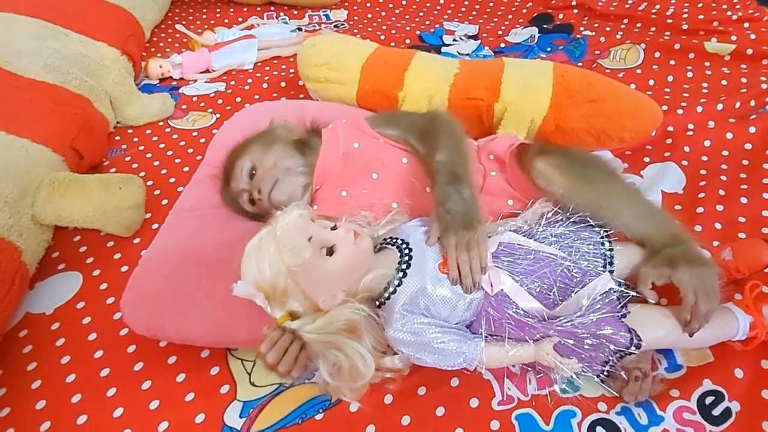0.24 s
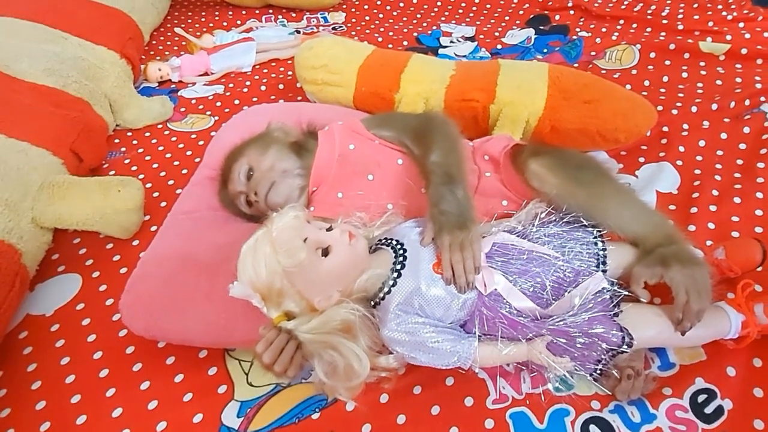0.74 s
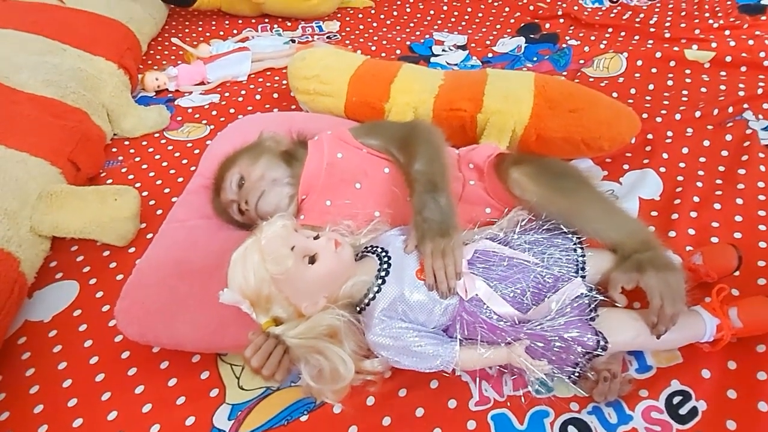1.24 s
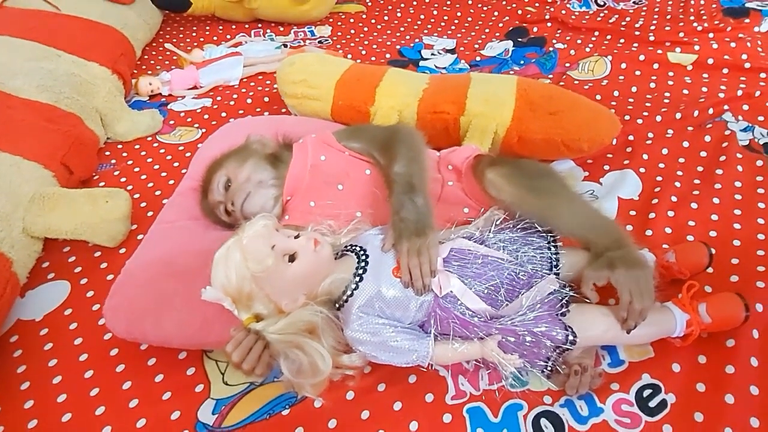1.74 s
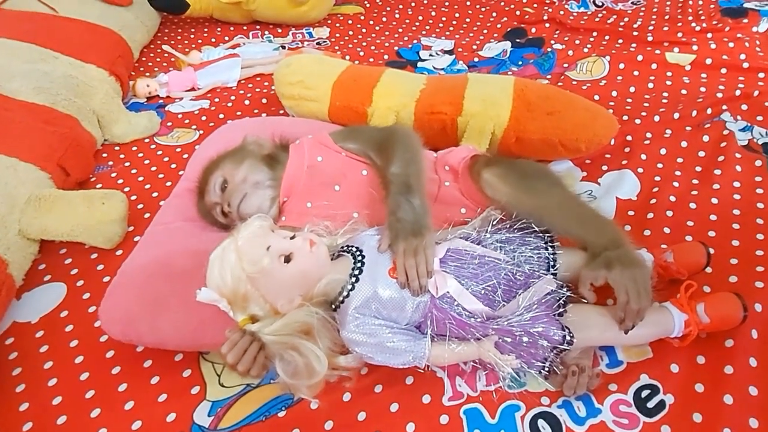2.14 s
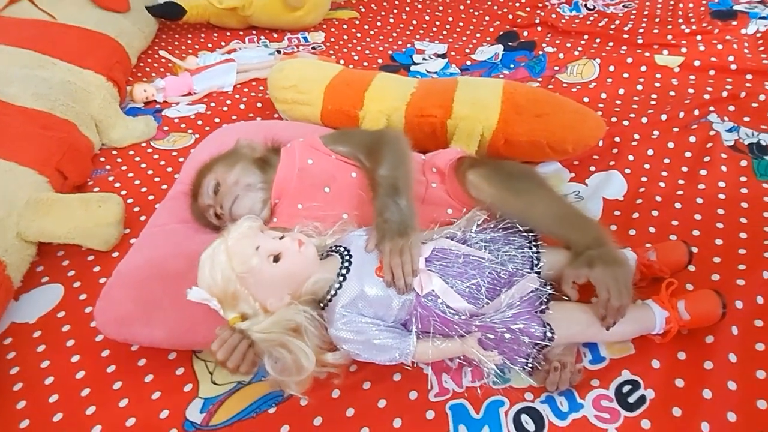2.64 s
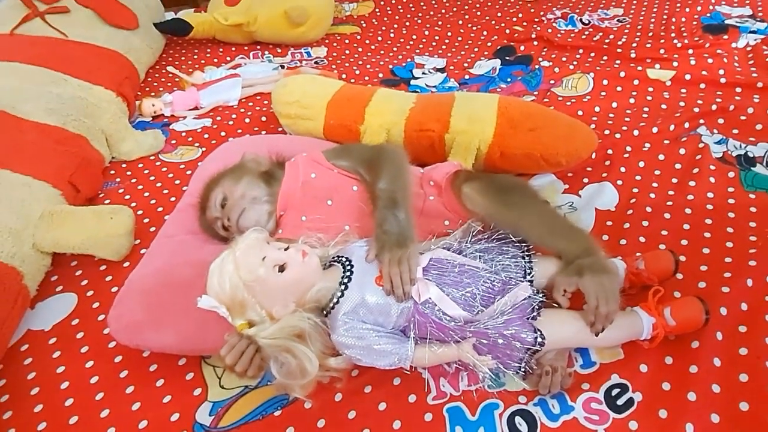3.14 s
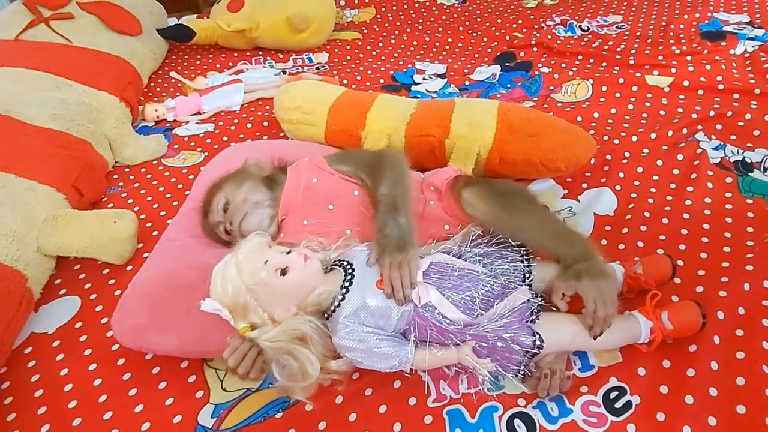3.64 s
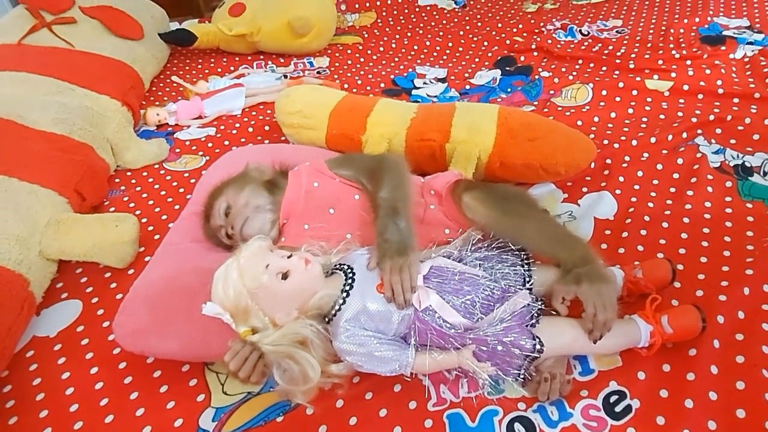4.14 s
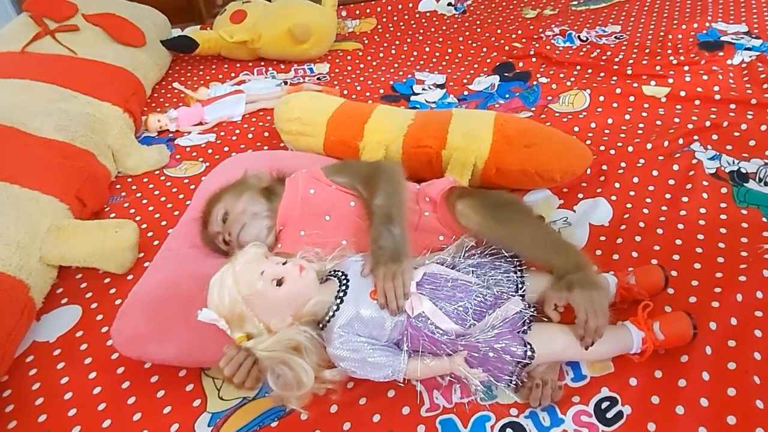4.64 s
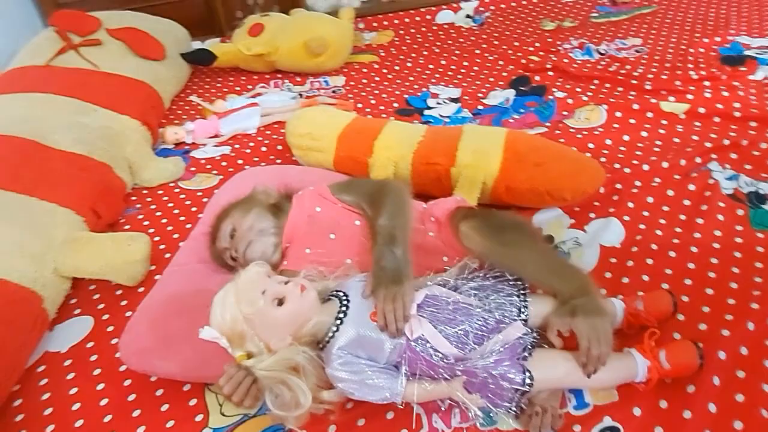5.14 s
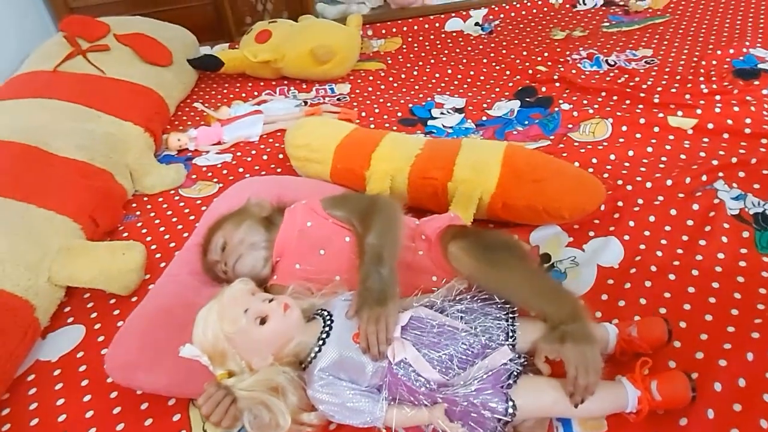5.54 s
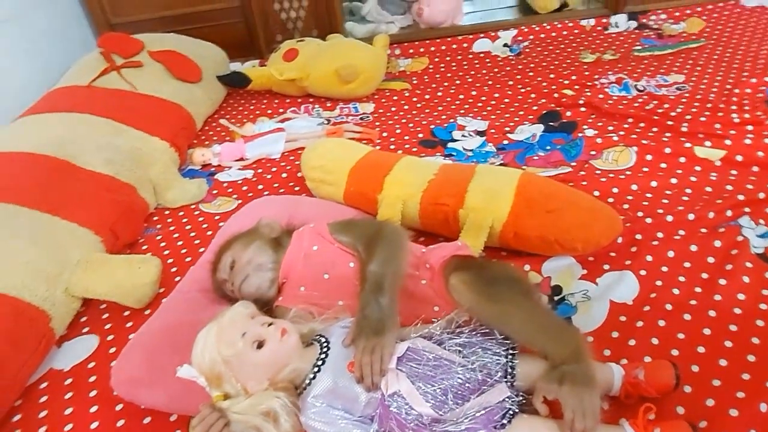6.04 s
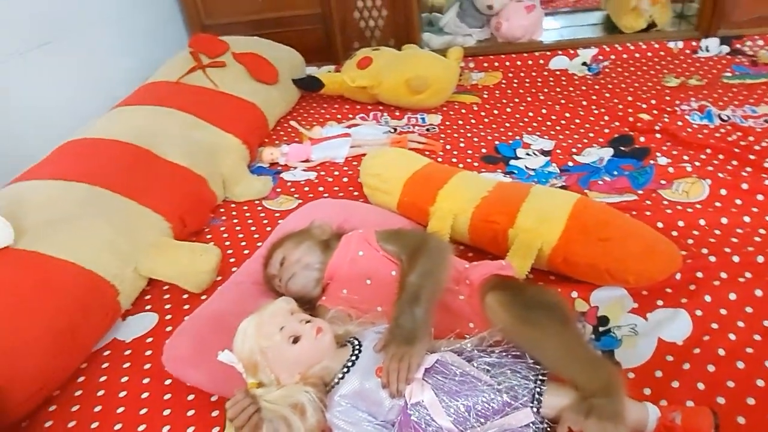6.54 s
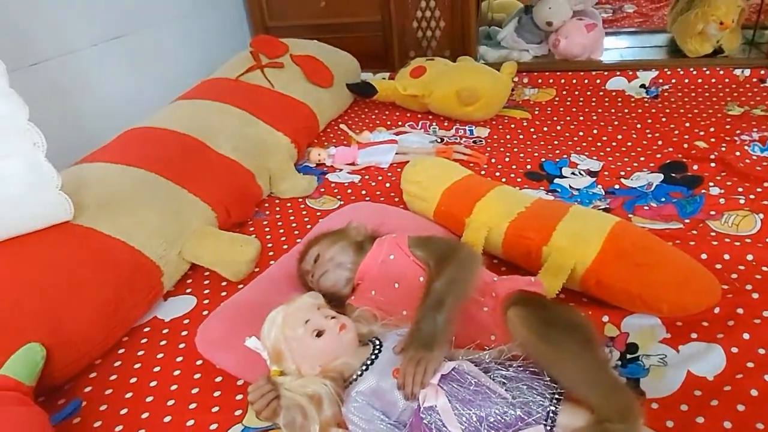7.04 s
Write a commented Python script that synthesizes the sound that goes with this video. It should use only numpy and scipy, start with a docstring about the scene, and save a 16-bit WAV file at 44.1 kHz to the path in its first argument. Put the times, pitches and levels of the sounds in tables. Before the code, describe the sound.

In a quiet bedroom, fingers shift on a hand-held camera right beside the microphone. A brief low creak comes first, then irregular clicks and small hollow taps mixed with scratchy rubbing, mostly on the left. The handling gets busier past the middle, with one sharp scraping click and another a second later. Bedding rustles faintly, more on the right, over a low room rumble and hiss.

```python
"""A quiet bedroom, where a small animal lies on bedding, heard through a hand-held camera.
Fingers tap, creak and slide on the casing beside the left microphone port; the taps make it ring near
330 Hz. The right port hears a little of the taps. Cloth rustles softly, more on the right.
Both ports share a low room rumble, and each has its own hiss."""
import sys
import numpy as np
from scipy import signal
from scipy.fft import rfft, irfft, next_fast_len
from scipy.io import wavfile
from scipy.ndimage import uniform_filter1d, map_coordinates

SR = 44100
rng = np.random.default_rng(int(sys.argv[2]) if len(sys.argv) > 2 else 0)


def generate_wav(sig):
    """Save sig (samples, or channels by samples) to the path in sys.argv[1] as 16-bit PCM at SR."""
    pcm = np.round(np.clip(np.atleast_2d(sig).T, -1, 1) * 32767).astype(np.int16)
    wavfile.write(sys.argv[1], SR, pcm)


N = 321048

# Tone colours of skin on the casing, bright grit and even higher fizz: f/Hz, level/dB
GRIT_COLOUR = [(2500, -4.5), (4000, -1), (5800, 1), (7000, -8), (8600, -19.5)]
FIZZ_COLOUR = [(7000, -15.5), (9500, 1.5), (12500, 5.5), (14500, -14.5), (16000, -13)]


def amp(db):
    return 10 ** (np.asarray(db) / 20)


def unit_rms(x):
    return x / np.sqrt(np.mean(x ** 2) + 1e-20)


def curves(rows):
    """Join timed points with straight lines: one curve for each column after the time."""
    times, *columns = np.transpose(rows)
    return [np.interp(np.arange(N) / SR, times, column) for column in columns]


def swells(rows):
    """Each row rises 30 dB, holds and fades; the rows add up to one gain curve per level column."""
    full_at, rise, hold, fall, *levels_db = np.transpose(rows)
    t = np.arange(0, N + 32, 32)[:, None] / SR
    before, after = (full_at - t) / rise, (t - full_at - hold) / fall
    shape = amp(-30 * np.maximum(0, np.maximum(before, after)))
    return [np.interp(np.arange(N) / SR, t[:, 0], shape @ amp(db)) for db in levels_db]


def wobble(rate):
    """A smooth curve through `rate` random points a second."""
    return map_coordinates(rng.standard_normal(int(N * rate / SR) + 4), [np.arange(N) * rate / SR])


def filtered(x, response):
    """Scale and delay each frequency in x as response(hz) says."""
    size = next_fast_len(N + SR // 2)
    return irfft(rfft(x, size) * response(np.fft.rfftfreq(size, 1 / SR)), size)[..., :N]


def resonances(hz, notes):
    """How strongly, and how late, a body that rings at these notes answers each frequency."""
    return sum((-1) ** k * amp(db) * 1j * hz * width / (centre ** 2 - hz ** 2 + 1j * hz * width)
               for k, (centre, width, db) in enumerate(notes))


def noise(colour, grain_db=0, rate=300, patchy_db=0):
    """Coloured noise of rms 1; grain makes its level jump, patches make parts of its range come and go."""
    freqs, db = np.transpose(colour)
    grainy = rng.standard_normal(N) * amp(grain_db * wobble(rate))
    spectra = signal.stft(grainy, nperseg=512)[2]
    patches = uniform_filter1d(rng.standard_normal(spectra.shape), size=7, axis=0)
    patches = unit_rms(uniform_filter1d(patches, size=12, axis=1))
    patchy = signal.istft(spectra * amp(patchy_db * patches), nperseg=512)[1][:N]
    tint = lambda hz: amp(np.interp(np.log(hz + 1), np.log(freqs), db, -120, -120))
    return unit_rms(filtered(patchy, tint))


def rumble_and_hiss():
    """The room's rumble is mostly alike at both ports; each port has its own hiss."""
    # How the rumble drifts: t/s, level/dB
    rumble_levels = [(0.0, -64), (.3, -63), (0.5, -57.5), (.8, -64.5), (1.65, -71), (1.92, -66),
                     (2.6, -68.5), (3.08, -70), (4.3, -69), (4.62, -63.5), (5.3, -68.5), (6.0, -69.5),
                     (6.7, -67.5), (7.28, -63)]
    # Tone colours: f/Hz, level/dB
    rumble_colour = [(30, -38.5), (42, -2.5), (52, 7), (100, -3), (160, -6), (300, -21.5), (600, -30),
                     (1200, -70.5)]
    hiss_colour = [(200, 7), (600, -7.5), (2000, -13.5), (3300, -18), (6000, -15.5), (8000, -16.5),
                   (12500, -8.5), (14200, -12.5), (15000, -36.5)]
    shared = noise(rumble_colour, grain_db=3.5, rate=23)
    rumble = np.array([gain * shared + .5 * noise(rumble_colour) for gain in (2.44, 1.43)])
    hiss = np.array([noise(hiss_colour, patchy_db=1.5), noise(hiss_colour, patchy_db=2.5)])
    return amp(curves(rumble_levels)[0]) * rumble + amp([[-74], [-76]]) * hiss


def cloth_rustle():
    """Cloth moves in soft patches; only the nearer, right port gets its swish and the casing's murmur."""
    # Cloth movements: full at/s, rise/s, hold/s, fall/s, cloth/dB, swish/dB, casing/dB
    movements = [(.15, 0.96, 0.24, .3, -78, -70.5, -78), (.45, 0.077, 0.03, .15, -79, -76, -44.5),
                 (.86, 0.031, .03, .12, -95, -91, -49.5), (1.215, 0.046, 0.021, .1, -79, -67, -65),
                 (1.46, 0.22, 0.019, .25, -78, -70, -61.5), (1.75, 0.037, 0.034, .1, -76, -73, -66),
                 (1.95, 0.056, 0.013, .15, -80, -69, -74), (4.45, .04, 0.033, .06, -63.5, -69, -75),
                 (4.57, 0.034, .03, .06, -73, -79, -62), (4.69, 0.061, 0.075, .08, -60, -62, -49.5),
                 (5.0, 0.17, 0.034, .2, -87.5, -74.5, -62), (5.5, 0.25, .3, .2, -83.5, -72.5, -82.5),
                 (5.76, 0.55, 0.082, .15, -70.5, -90, -100.5), (6.1, 0.39, 0.29, .1, -64.5, -74.5, -73),
                 (7.13, 0.17, 0.041, .2, -96, -96.5, -65.5)]
    # Faint swish beneath the movements: t/s, level/dB
    faint_swish = [(0, -73.5), (1.5, -78.5), (2.4, -77.5), (3.5, -111), (4.4, -90), (5.3, -76),
                   (7.28, -89.5)]
    # Tone colours: f/Hz, level/dB
    cloth_colour = [(500, -6), (1000, -5), (1700, 4.5), (2700, -8), (3500, -20), (5000, -39)]
    swish_colour = [(2800, -15), (4500, -4), (6000, -1), (8500, -2), (12000, -4.5), (14300, -8),
                    (15500, -27.5)]
    casing_colour = [(60, -37.5), (130, 13), (300, -13.5), (500, -8.5), (1000, -25), (2000, -48.5)]
    cloth_gain, swish_gain, casing_gain = swells(movements)
    cloth_gain *= amp(1.5 * wobble(25))
    left, right = (cloth_gain * noise(cloth_colour, grain_db=2.5, rate=200, patchy_db=1.6)
                   for port in range(2))
    swish_gain += amp(curves(faint_swish)[0])
    swish_gain *= amp(.8 * wobble(15))
    swish = swish_gain * noise(swish_colour, grain_db=1.5, rate=400, patchy_db=1.4)
    murmur = casing_gain * noise(casing_colour, grain_db=3.5, rate=150)
    return np.array([amp(-0.5) * left, right + swish + murmur])


def finger_taps():
    """Each tap is a short click with a gritty snap, then the casing's ring and a low thump."""
    # Taps: t/s, click/dB, click f/Hz, ring/dB, thump/dB, grit/dB, fizz/dB, extra drop on the right/dB
    taps = [(0.234, -48.5, 1100, -62, -55, -40, -59, 14), (0.255, -53, 783, -47, -46, -66, -66, 30),
            (0.84, -62, 730, -59, -47.5, -80, -71, -3), (1.203, -24, 1090, -37, -41, -34, -39, 18),
            (1.239, -40.5, 1330, -50, -58, -42, -66, 8), (1.329, -54, 826, -55, -47, -53, -70, 17),
            (1.381, -51, 740, -45.5, -48, -72, -68, 27), (1.406, -60, 766, -42, -45, -74, -62, 24),
            (1.439, -43, 750, -47, -53, -49.5, -65, 8), (1.474, -56, 795, -54, -71, -68, -71, 16),
            (1.562, -44, 760, -42, -46.5, -66, -62, 24), (1.733, -35.5, 1106, -47, -42, -62, -63, 19),
            (1.738, -30.5, 760, -30, -35, -39, -37, 24), (1.755, -58, 760, -35, -39.5, -65, -60, 28),
            (1.774, -37, 668, -30.5, -35.5, -47, -64, 31), (1.829, -45.5, 663, -33.5, -37.5, -52, -48, 38),
            (1.93, -37.5, 755, -34, -37, -45.5, -40.5, 21), (1.948, -48, 686, -41, -37, -63, -62, 16),
            (1.966, -53, 800, -42, -57, -65, -55, 26), (2.247, -20.5, 635, -33, -31, -15, -31.5, 39),
            (2.414, -33.5, 824, -44.5, -45, -36.5, -54, 34), (2.608, -33, 1120, -48.5, -42, -56, -71, 34),
            (2.764, -35, 1090, -44.5, -35.5, -48, -68, 43), (3.182, -48, 1270, -63, -59, -66, -55, 26),
            (3.575, -33.5, 1510, -50, -58, -43, -65, 29), (3.595, -31.5, 960, -47, -37.5, -49, -65, 38),
            (3.806, -45, 1560, -70, -39.5, -67, -58, 36), (3.846, -19.5, 1620, -53, -45, -21, -41.5, 33),
            (3.894, -37, 910, -53, -34, -53, -60, 34), (3.939, -17, 1410, -40.5, -37, -20, -42, 51),
            (4.027, -44, 1040, -40, -36, -66, -72, 32), (4.078, -48, 1070, -54, -56, -70, -66, 24),
            (4.159, -52, 1130, -60, -60, -50, -64, 25), (4.287, -42.5, 1290, -48, -55, -42, -62, 23),
            (4.41, -42, 2300, -31, -34, -24, -37.5, 21), (4.446, -20.5, 845, -29, -26.5, -36, -42, 33),
            (4.531, -52, 805, -44, -52, -65, -70, 30), (4.557, -25, 1010, -35.5, -32.5, -37.5, -61, 20),
            (4.596, -25, 1140, -39, -43, -32, -34, 17), (4.68, -26, 730, -38.5, -42, -40.5, -36.5, 7),
            (4.704, -41, 950, -56, -37, -39, -50, 17), (4.72, -34.5, 990, -33.5, -48, -41, -38, 6),
            (4.803, -22.5, 1400, -33, -31.5, -22, -15, 37), (4.867, -37.5, 1250, -39, -38.5, -36, -55, 22),
            (4.926, -35, 820, -22.5, -29.5, -35, -45, 43), (5.04, -27.5, 1930, -43, -44, -43, -52.5, 46),
            (5.064, -13, 1000, -44, -58, -13.5, -17.5, 53), (5.068, -11, 1280, -40, -45.5, -28, -24, 56),
            (5.231, -45, 1010, -40, -39.5, -43.5, -57, 38), (5.84, -63.5, 1400, -77, -80, -77, -73, -3),
            (6.301, -24, 1203, -35.5, -54, -39.5, -51.5, 40.5),
            (6.3025, -10.5, 1256, -16.5, -23, -19.5, -26.5, 45),
            (6.358, -37.5, 1650, -54.5, -67, -69, -66.5, 22),
            (6.793, -55.5, 803, -48, -48.5, -66, -68, 31.5), (6.929, -52.5, 705, -38, -41, -63, -69.5, 28),
            (7.007, -53.5, 680, -38, -38.5, -70.5, -53.5, 27)]
    out, t = np.zeros((2, N + SR)), np.arange(SR // 10) / SR
    grit, fizz = (np.pad([noise(colour), noise(colour)], [(0, 0), (0, SR)])
                  for colour in (GRIT_COLOUR, FIZZ_COLOUR))
    fade = lambda rise, fall: amp(-60 * t / fall) * (1 - np.exp(-(t / rise) ** 2))  # both in seconds
    wave = lambda hz: np.sin(2 * np.pi * hz * t)
    for start, click_db, click_hz, ring_db, thump_db, grit_db, fizz_db, drop_db in taps:
        tune = 1 + .04 * rng.standard_normal(3)
        span = slice(round(start * SR), round(start * SR) + len(t))
        bite = 0.8 * amp(0.45 * (click_db + 12))  # harder taps have a stronger overtone
        tones = wave(click_hz) + bite * wave(2.2 * click_hz) + .5 * wave(0.63 * click_hz)
        click = 3.0 * amp(click_db) * fade(0.00028, 3.1 / click_hz) * tones
        ring = -2.6 * amp(ring_db) * fade(0.0013, 0.031) * np.sin(2 * np.pi * 335 * tune[0] * (t - .0009))
        thump = 3.56 * amp(thump_db) * fade(0.002, 0.026) * (wave(100 * tune[1]) + 0.77 * wave(190 * tune[2]))
        snap = 0.41 * fade(0.00029, 0.0093) * (amp(grit_db) * grit[:, span] + amp(fizz_db) * fizz[:, span])
        far_note = amp(click_db) * fade(0.0025, 0.028) * wave(850 * tune[2])  # the casing's far end
        out[0, span] += click + ring + thump + snap[0]
        # The far port gets more of the snap, which travels through the air, than of the ring.
        right = 0.19 * click + 0.42 * (ring + thump) + 2.7 * snap[1] + 0.37 * far_note
        out[1, span] += amp(-drop_db) * right
    return out[:, :N]


def finger_creak():
    """A finger sticks and slips, giving the casing one rounded push per slip, uneven in time and size."""
    # Course of the creak: t/s, level/dB, slip rate/Hz
    creak_path = [(.29, -87, 95), (.3, -35.5, 110), (.335, -35.5, 130), (.365, -27, 129), (.385, -29.5, 94),
                  (.408, -21, 162.6), (.43, -27.5, 123.6), (.45, -21.5, 90), (.497, -22.5, 81),
                  (.53, -79, 140)]
    notes = [(92, 94, 40.7), (366, 170, 36.76), (1400, 180, 24)]  # f/Hz, width/Hz, level/dB
    level_db, slip_hz = curves(creak_path)
    slip_count = np.floor(np.cumsum(slip_hz * amp(3.5 * wobble(60))) / SR)
    pushes = np.diff(slip_count, prepend=0) * amp(level_db + 2.5 * rng.standard_normal(N))
    return filtered(pushes, lambda hz: resonances(hz, notes) / (1 + 1j * hz / 1100) ** 4)


def finger_slides():
    """Sliding skin rubs unevenly, and its soft catches make the casing ring in a stutter."""
    # Finger strokes: full at/s, rise/s, hold/s, fall/s, rub/dB, scrape/dB, grit/dB, stutter/dB
    strokes = [(.405, 0.19, 0.086, 0.11, -61, -73, -73.5, -50.5),
               (.84, 0.0087, .08, .08, -86, -98, -93, -60.5),
               (1.21, 0.024, 0.047, 0.045, -64.5, -68, -66, -57.5),
               (1.42, 0.3, 0.062, 0.28, -63, -70.5, -74.5, -50.5),
               (1.739, 0.01, .01, 0.087, -73, -75, -77, -44),
               (1.938, 0.0079, 0.0087, 0.3, -57, -67, -75, -48),
               (2.25, 0.026, 0.051, 0.075, -50, -54, -53, -54),
               (2.422, 0.017, 0.046, 0.12, -52.5, -57, -55, -62.5),
               (2.675, 0.058, 0.033, 0.031, -54.5, -47, -49, -65),
               (2.86, 0.59, 0.02, 0.11, -67.5, -67, -70.5, -61),
               (3.175, 0.023, 0.048, 0.086, -55, -53, -59, -73),
               (3.39, 0.22, 0.049, .05, -55.5, -57.5, -70.5, -59.5),
               (3.585, 0.018, 0.047, 0.21, -54, -51.5, -55, -60),
               (3.74, 0.027, .035, .03, -63, -62, -65, -66),
               (3.805, 0.029, 0.019, .02, -53, -53.5, -60.5, -64),
               (3.855, 0.018, .12, 0.11, -50.5, -49.5, -53.5, -53),
               (4.288, 0.095, 0.0045, 0.089, -70, -76, -78, -53.5),
               (4.415, .01, 0.0029, 0.039, -63, -51, -58.5, -36.5),
               (4.452, 0.0088, 0.01, 0.19, -60, -58.5, -59.5, -44),
               (4.565, .015, 0.033, 0.12, -59.5, -60, -65.5, -48),
               (4.72, 0.09, 0.068, .04, -61, -66.5, -65.5, -47),
               (4.809, 0.015, 0.0048, 0.082, -48.5, -56.5, -53, -47.5),
               (5.0, 0.15, 0.057, 0.061, -57.5, -54, -56.5, -51.5),
               (5.06, 0.069, 0.0042, 0.044, -37.5, -30, -39.5, -33),
               (5.13, 0.047, 0.034, 0.064, -54.5, -58.5, -59, -44.5),
               (6.02, 0.044, 0.072, .1, -72.5, -66.5, -65.5, -63.5),
               (6.22, 0.026, 0.039, .06, -75.5, -64, -75.5, -62),
               (6.62, 0.075, 0.067, .03, -58.5, -69.5, -73.5, -55.5),
               (7.09, 0.018, 0.1, .1, -68, -86, -88.5, -61.5)]
    # Notes the casing rings at: f/Hz, width/Hz, level/dB
    casing_notes = [(102, 96, -0.5), (305, 100, 11), (743, 100, -18.5)]
    # Tone colours of the dull rub and the hollow scrape: f/Hz, level/dB
    rub_colour = [(300, -28), (600, -6), (1050, 0), (1280, -3), (1500, -14), (2500, -35)]
    scrape_colour = [(1000, -28), (1500, -6), (1950, 0), (2700, -6), (3200, -13), (3900, -32)]
    rub_gain, scrape_gain, grit_gain, stutter_gain = swells(strokes)
    firm_db = -48.5  # grit level of a firm stroke
    fizz_gain = amp(firm_db - 12.5) * (grit_gain / amp(firm_db)) ** 1.3  # grows faster than the grit
    uneven = amp(2.2 * wobble(40))
    catches = (rng.random(N) < 260 / SR) * amp(2.8 * rng.standard_normal(N))  # about 260 a second
    catches += 0.0099 * rng.standard_normal(N)
    # A fingertip is too soft to click, so the highs roll off.
    stutter = filtered(catches, lambda hz: resonances(hz, casing_notes) / (1 + 1j * hz / 900) ** 2)
    rub = rub_gain * noise(rub_colour, grain_db=3, rate=150, patchy_db=1.6)
    scrape = scrape_gain * noise(scrape_colour, grain_db=3, rate=250, patchy_db=2.2)
    grit = grit_gain * noise(GRIT_COLOUR, grain_db=2.5, rate=500, patchy_db=1.6)
    fizz = fizz_gain * noise(FIZZ_COLOUR, grain_db=1.5, rate=500, patchy_db=1.2)
    return stutter_gain * unit_rms(stutter) + uneven * (rub + scrape + grit + fizz)


def scene():
    """Slides and creak reach only the left port; the other sounds reach both."""
    left_only = (finger_slides() + finger_creak()) * [[1], [0]]
    return left_only + cloth_rustle() + finger_taps() + rumble_and_hiss()


def record(dry):
    """The camera cuts the deepest bass and keeps nothing above 16500 Hz."""
    return filtered(dry, lambda hz: (hz < 16500) * (1j * hz / (30 + 1j * hz)) ** 3)


dry = scene()
out = record(dry)
generate_wav(out)
```